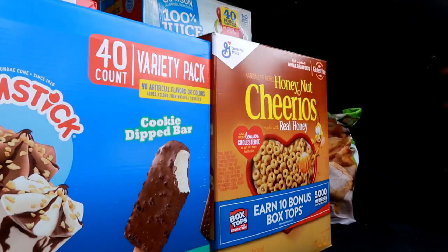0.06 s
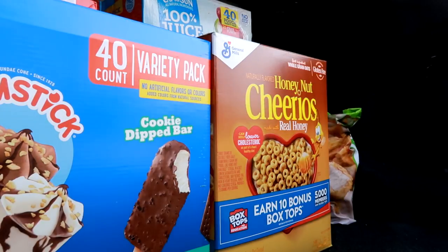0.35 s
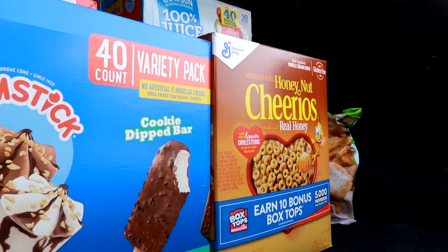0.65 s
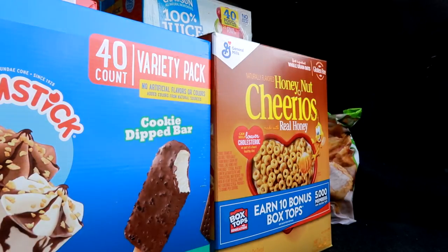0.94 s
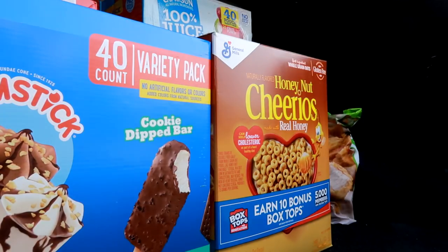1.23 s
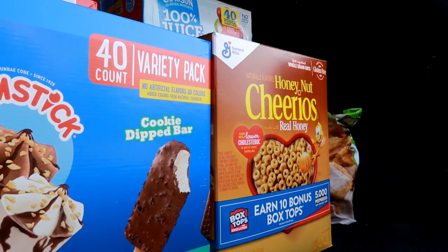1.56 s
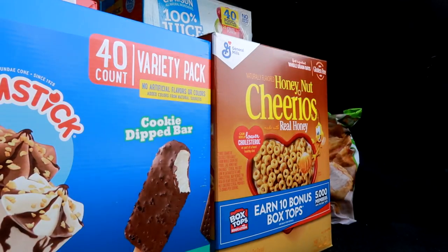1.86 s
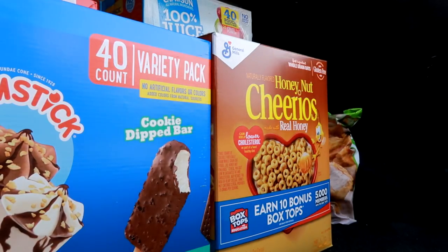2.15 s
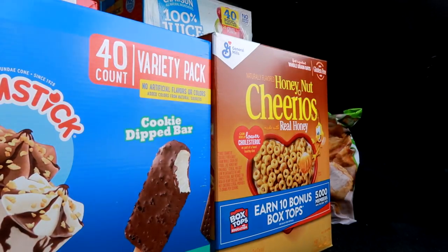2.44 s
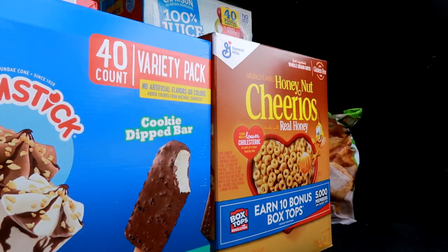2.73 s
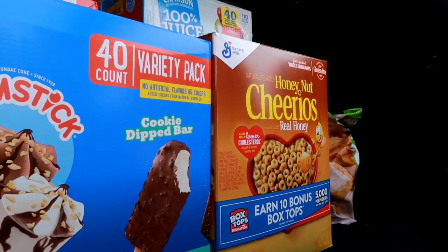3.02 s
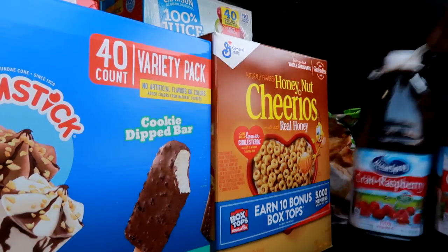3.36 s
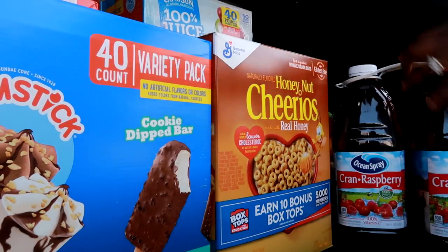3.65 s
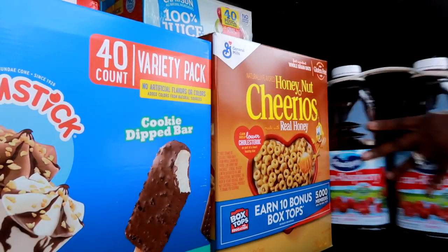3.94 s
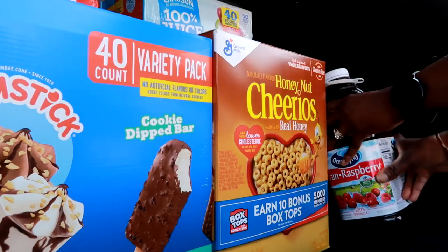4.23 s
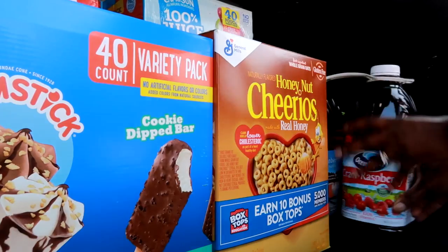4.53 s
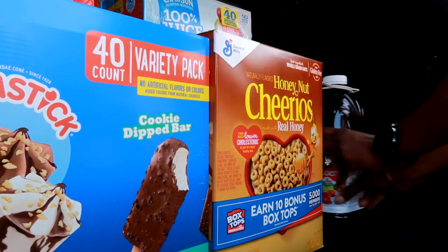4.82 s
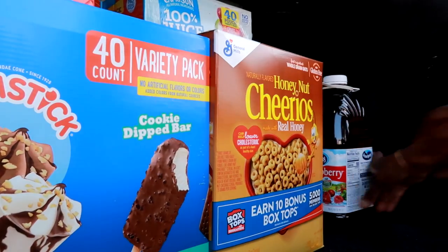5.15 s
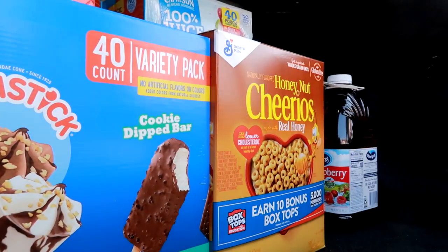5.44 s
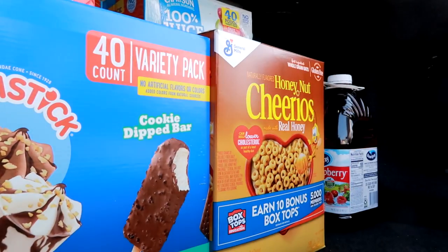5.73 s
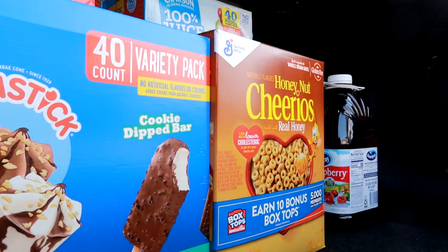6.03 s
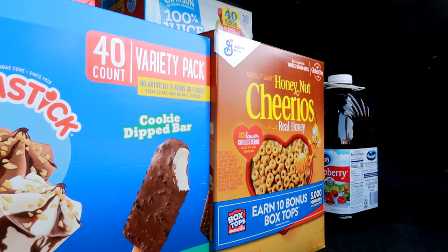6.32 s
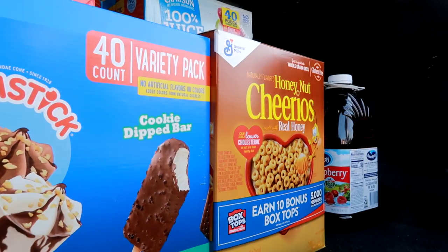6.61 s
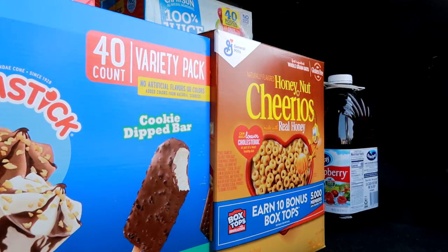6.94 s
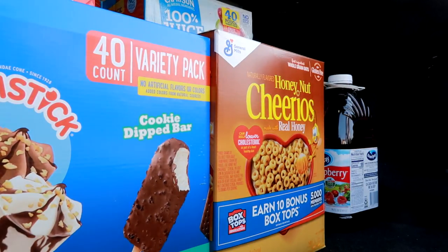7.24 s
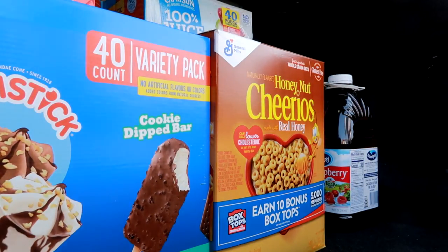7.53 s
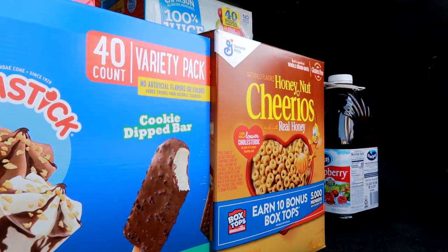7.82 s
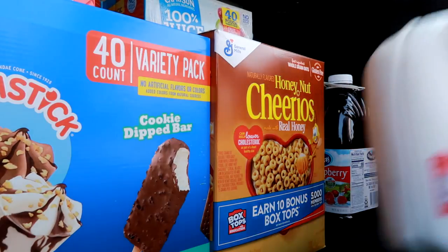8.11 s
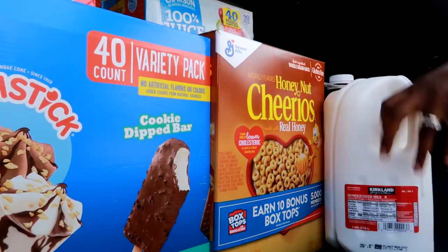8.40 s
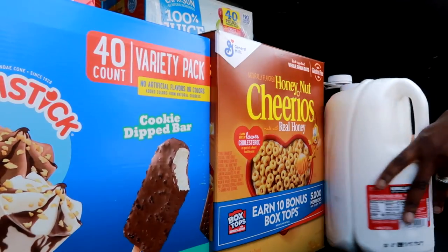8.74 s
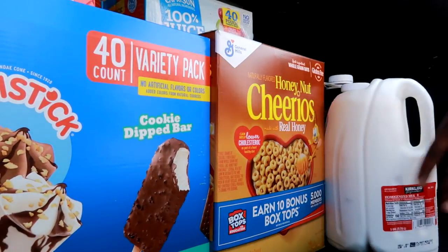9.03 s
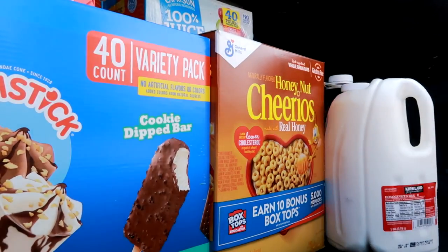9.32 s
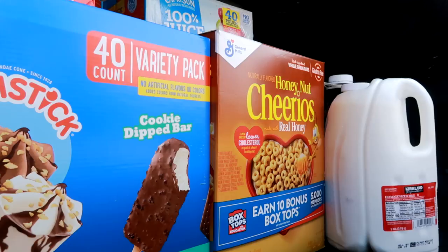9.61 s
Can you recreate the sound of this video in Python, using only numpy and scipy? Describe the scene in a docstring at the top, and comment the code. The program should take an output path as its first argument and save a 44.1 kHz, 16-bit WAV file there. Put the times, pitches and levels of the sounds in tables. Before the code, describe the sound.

Over a low engine-like hum and outdoor hiss, full plastic bottles and a jug scrape along cardboard, thump down and slosh.

```python
"""First comes a low wavering drone with rumble and outdoor hiss, as groceries are loaded into a car.
Plastic squeaks on card, snaps and rustles close by. Two juice bottles thud down, slosh and are shoved
in beside the cartons, their ribbed walls crackling. Later a milk jug catches and slides past a carton,
which makes its thin wall ring; then it lands and sloshes. Both landings make a limiter (an automatic
volume control) turn everything down, and the background creeps back."""
import sys
import numpy as np
from scipy import signal
from scipy.fft import rfft, irfft
from scipy.io import wavfile
from scipy.ndimage import uniform_filter1d, minimum_filter1d, map_coordinates

SR = 44100
rng = np.random.default_rng(int(sys.argv[2]) if len(sys.argv) > 2 else 0)


def unload_audio(sound):
    """Save the sound as a 16-bit wav file, at the path given as the first command line argument."""
    columns = np.transpose(np.atleast_2d(sound))
    # keep every value between -1 and 1, then stretch to whole-number steps
    steps = np.round(np.clip(columns, -1, 1) * 32767)
    wavfile.write(sys.argv[1], SR, steps.astype(np.int16))


N = 426447
TIME = np.arange(N) / SR
FREQS = np.fft.rfftfreq(8192, 1 / SR)

# the jug catches on a carton, then slips (time [s], catch level [dB], slide length [s], slide level [dB])
JUG_CATCHES = [(7.405, -22.5, 0.05, -32), (7.532, -23, 0.08, -34), (7.673, -23.5, 0.037, -29.5),
               (7.795, -21.5, 0.007, -29.5), (7.915, -26, 0.32, -24.5)]


def amp(db):
    """Turns decibels into a factor to multiply by."""
    return 10 ** (np.asarray(db) / 20)


def unit(x):
    """Scales a signal to an average strength (rms) of 1."""
    return x / np.sqrt(np.mean(x ** 2) + 1e-20)


def curve(rows):
    """Joins (time, value) points with straight lines."""
    return np.interp(TIME, *np.transpose(rows))


def shaped(x, response):
    """Filters a sound with one gain for each frequency in FREQS."""
    return signal.oaconvolve(x, np.fft.fftshift(irfft(response))[1:], "same")


def colour(x, points, peaks=()):
    """Gives a sound its tone: a smooth spectrum with resonances on top, at strength 1."""
    hz, db = np.transpose(points)
    shape_db = np.interp(np.log(FREQS + 1), np.log(hz), db)
    for centre, width, height in peaks:
        shape_db = shape_db + height / (1 + (2 * (FREQS - centre) / width) ** 2)
    return unit(shaped(x, amp(shape_db)))


def wander(rate_hz):
    """A random drift of strength 1 that wobbles up to about rate_hz."""
    coarse = TIME[::50]
    hz = np.fft.rfftfreq(len(coarse), coarse[1])
    spectrum = rfft(rng.standard_normal(len(coarse))) / (1 + (hz / rate_hz) ** 4)
    return np.interp(TIME, coarse, unit(irfft(spectrum, len(coarse))))


def add(mix, start, sound):
    """Mixes a sound in at start, given in seconds."""
    part = mix[max(round(start * SR), 0):][:len(sound)]
    part += sound[:len(part)]


def strokes(rows, attack_s, release_s):
    """Loudness of (start, length, dB) strokes: up 20 dB per attack_s, hold, down 20 dB per release_s."""
    power = np.zeros(N)
    for start, length, db in rows:
        away = np.maximum((start - TIME) / attack_s, (TIME - start - length) / release_s)
        power += amp(db - 20 * np.clip(away, 0, 10)) ** 2
    return np.sqrt(power)


def slips(per_s, spread_db, hiss):
    """Rubbing surfaces stick and slip: tiny random clicks over a smooth hiss."""
    sizes = amp(spread_db * np.minimum(rng.exponential(1, N), 4)) * rng.choice([-1, 1], N)
    clicks = unit(sizes * (rng.random(N) < per_s / SR))
    return unit(clicks + hiss * rng.standard_normal(N))


def crinkles(per_s, q):
    """Patches of thin plastic each buckle per_s times a second; a higher q rings longer."""
    out = np.zeros(N)
    for hz in np.geomspace(230, 6500, num=34):
        clicks = np.zeros(N)
        at = rng.integers(0, N, round(per_s * N / SR))
        clicks[at] = rng.choice([-1, 1], len(at)) * amp(3 * np.minimum(rng.exponential(1, len(at)), 3))
        out += signal.lfilter(*signal.iirpeak(hz, q, fs=SR), clicks + 1e-12)
    return unit(out)


def drone():
    """A gliding, fluttering hum like a nearby engine, with a faint higher tone and the car's rumble."""
    # glide of the hum (time [s], pitch [Hz])
    glide = [(0, 86.33), (.7, 97.4), (1.45, 98.8), (2.05, 93.9), (3.1, 88.37), (4.15, 87.4), (4.5, 89.44),
             (5.7, 94.36), (6.1, 97.1), (6.5, 92.34), (8, 88.12), (8.3, 83.74), (8.8, 89.7), (9.67, 84.5)]
    # how strongly it booms in the car (time [s], level [dB])
    hum_level = [(0, -18), (.5, -8.5), (1.4, -11.5), (2.2, -17), (2.5, -8.5), (3.05, -8.5), (3.9, -15.5),
                 (4.25, -6.5), (5.6, -9.5), (6.1, -27.5), (6.6, -12.5), (7.3, -9.5), (7.5, -15.5),
                 (8.25, -10), (8.55, -27), (9.1, -16), (9.35, -23.5), (9.67, -7.5)]
    # the higher tone (time [s], level [dB])
    upper_level = [(0, -32), (1.4, -21.5), (2.3, -33), (6, -24), (7.2, -30), (9.67, -43)]
    # tone of the car body's rumble (frequency [Hz], level [dB])
    rumble_tone = [(8, -64), (22, -2.5), (38, 17), (52, 21.5), (72, 20.5), (100, 21), (135, 10), (220, -52)]
    # swells of the rumble (time [s], level [dB])
    rumble_level = [(0, -15), (.8, -19.5), (1.4, -12), (3.2, -18.5), (3.6, -11), (4.9, -29), (5.4, -16.5),
                    (5.9, -17.5), (7.5, -18.5), (8.2, -15), (9, -24.5), (9.67, -15)]
    pitch = curve(glide)
    turns = np.cumsum(pitch + 0.5 * wander(9.2)) / SR
    hum = unit(np.sin(2 * np.pi * turns)) * amp(curve(hum_level) + 2.0 * wander(15.2))
    upper_turns = np.cumsum(1.54 * pitch + 2.24 * wander(11.9)) / SR
    upper = unit(np.sin(2 * np.pi * upper_turns)) * amp(curve(upper_level) + 1.4 * wander(1.3))
    rumble = colour(rng.standard_normal(N), rumble_tone) * amp(curve(rumble_level))
    return hum + upper + rumble


def outdoor_air():
    """A wash of noise from outside, made hollow by the cargo space."""
    # tone of the wash (frequency [Hz], level [dB])
    tone = [(60, -2), (110, -7), (150, -3), (200, -7.5), (260, -10), (330, -18.5), (500, -18), (640, -26.5),
            (1100, -21), (2000, -29), (3200, -37.5), (5000, -44), (10000, -48.5), (14000, -59.5)]
    # resonances of the cargo space (frequency [Hz], width [Hz], boost [dB])
    cabin = [(371, 6.6, 3), (520, 80, 4.5), (741, 273, 7), (1043, 19, 4)]
    # swells of the wash (time [s], level [dB])
    level = [(0, -21.5), (1.2, -21), (2.1, -21.5), (3.1, -21), (4.2, -22), (5.5, -21), (6.7, -20.5),
             (7.5, -20.5), (8.6, -22.5), (9.67, -20.5)]
    return colour(rng.standard_normal(N), tone, cabin) * amp(curve(level) + 1.3 * wander(20.3))


def squeaks():
    """Plastic catches on card and rings one note for a moment; the jug groans at each of its catches."""
    # squeaks (time [s], level [dB], pitch [Hz], width [Hz], length [s])
    events = [(0, -38.5, 2080, 250, 0.17), (0.099, -41.5, 2220, 400, 0.16), (1.7, -50, 3670, 250, 0.13),
              (1.909, -48.5, 3670, 220, 0.42), (5.292, -27.5, 2940, 350, 0.013),
              (7.391, -32, 1160, 150, 0.12), (7.525, -28.5, 2340, 200, 0.074),
              (7.672, -21.5, 1580, 50, 0.049), (7.677, -26.5, 743, 40, .05),
              (7.682, -28.5, 2860, 90, 0.042), (7.802, -30, 1610, 80, .045), (7.805, -27, 3190, 260, 0.065),
              (7.925, -32, 1580, 70, .045), (7.925, -26, 740, 50, .05), (7.996, -25, 3700, 400, 0.062),
              (8.052, -30.5, 4150, 349.6, .07), (8.233, -31, 3770, 250, .07), (8.813, -28, 610, 207, 0.13)]
    groan_db, groan_hz, groan_width_hz, groan_s = -7, 766, 26, 0.048
    groans = [(start, db + groan_db, groan_hz, groan_width_hz, groan_s) for start, db, _, _ in JUG_CATCHES]
    out = np.zeros(N)
    for start, db, hz, width, length in events + groans:
        progress = np.linspace(0, 1, round(length * SR))
        swell = np.sqrt(progress) * (1 - progress)
        ring = signal.lfilter(*signal.iirpeak(hz, hz / width, fs=SR), rng.standard_normal(SR // 2))
        add(out, start, amp(db) * unit(ring[-len(swell):] * swell))
    return out


def snaps():
    """Short cracks ring many wall notes at once; low ones bring out the hollow card."""
    # snaps of plastic and taps on card (time [s], level [dB], centre [Hz], time to fade 60 dB [s])
    events = [(0.191, -21, 696, 0.04), (1.0692, -14.5, 3400, 0.018), (1.079, -22, 3500, 0.025),
              (1.511, -24, 1580, 0.018), (2.43, -32, 3000, 0.024), (3.239, -15.5, 1080, 0.04),
              (3.312, -30, 822, 0.02), (3.811, -19, 910, 0.039), (3.974, -20, 2414, 0.033),
              (4.073, -19.5, 3743, 0.018), (4.145, -17, 8500, 0.018), (4.156, -16, 6500, 0.024),
              (4.171, -16, 1750, 0.025), (4.195, -25, 1500, 0.028), (4.226, -13, 1210, 0.054),
              (4.234, -7, 2300, 0.017), (4.251, -6, 1400, 0.038), (4.276, -11, 1300, 0.082),
              (4.328, -14, 2000, 0.04), (4.357, -14.5, 1220, 0.028), (4.453, -19, 1420, 0.029),
              (4.486, -29, 2310, 0.029), (4.516, -32, 3000, 0.021), (4.589, -21.5, 2600, 0.027),
              (4.632, -16.5, 910, 0.039), (4.67, -24, 3200, .03), (4.714, -21, 6400, 0.072),
              (4.7674, -7, 3480, 0.018), (4.8235, -15.5, 2300, 0.027), (4.8631, -12, 2700, 0.021),
              (4.884, -12.5, 2480, 0.03), (4.96, -17, 5500, .035), (4.9863, -.5, 6700, 0.02),
              (5.058, -10.5, 3470, 0.024), (5.249, -17.5, 3360, 0.022), (5.388, -20, 3060, 0.02),
              (6.438, -15.5, 1160, 0.1), (6.994, -36, 2960, 0.031), (7.218, -29.5, 2200, .03),
              (7.312, -21.5, 2070, 0.05), (7.403, -23, 3770, 0.13), (7.801, -22, 2400, 0.06),
              (7.92, -19, 1300, 0.036), (8.377, -15, 760, 0.024), (8.416, -8, 1470, 0.03),
              (8.43, -16, 1540, 0.18), (8.569, -22, 1120, .035)]
    card_hz, card_width_hz, spread_octaves, rise_share = 900, 140, 1.37, 0.035
    out, t = np.zeros(N), np.arange(4096) / SR
    freqs = np.fft.rfftfreq(len(t), 1 / SR)
    hollow = 1 + amp(3) / (1 + (2 * (freqs - card_hz) / card_width_hz) ** 2)
    for start, db, hz, fade_s in events:
        band = (1 + (np.log2((freqs + 1) / hz) / (2 * spread_octaves)) ** 2) ** -4.2
        ring = unit(irfft(rfft(rng.standard_normal(len(t))) * band * hollow))
        age = t / max(fade_s, .004)
        rise = 1 - np.exp(-age / rise_share)  # longer rings start more softly
        add(out, start, amp(db + 3.5 - 60 * age) * ring * rise)
    return out


def bottle_knocks():
    """A knock rings a bottle's hollow plastic shoulder; stiffer spots ring higher and shorter."""
    # knocks (time [s], level [dB], pitch [Hz])
    events = [(0.191, -25, 618), (3.239, -13.5, 1008), (3.312, -24, 642), (3.811, -20, 720),
              (4.171, -21, 1396), (4.279, -19, 1090), (4.381, -22.5, 1160), (4.574, -21, 1136),
              (4.62, -28, 1338), (4.742, -24, 1490), (4.903, -19, 1250), (4.944, -18, 1040),
              (4.768, -15, 3070), (5.06, -16, 1880), (5.062, -9, 4170), (5.25, -18.5, 4200),
              (5.388, -19.5, 2780), (6.44, -26, 830)]
    # notes of the shoulder (multiple of the pitch, level [dB], time to fade 60 dB [cycles of the pitch])
    shoulder = [(1, 1.5, 50), (1.12, -1, 38), (1.32, -0.5, 52), (1.96, -2, 28), (2.23, -5, 42),
                (2.71, -6, 42)]
    rise_s = 0.00049
    out, t = np.zeros(N), np.arange(SR // 5) / SR
    for start, db, hz in events:
        ring = np.zeros(len(t))
        for multiple, note_db, cycles in shoulder:
            note = np.sin(2 * np.pi * (hz * multiple * t + rng.random()))
            ring += amp(note_db - 60 * t * hz / cycles) * note
        add(out, start, amp(db) * ring * (1 - np.exp(-t / rise_s)))
    return out


def carton_rustle():
    """Hands and packaging rub lightly, almost smoothly, on the cartons."""
    # tone of the rubbing (frequency [Hz], level [dB])
    tone = [(300, -5), (700, -18.5), (2000, 5), (3500, -1), (6000, -6.5), (10000, -7.5), (14000, -19.5)]
    # resonances of the carton panels (frequency [Hz], width [Hz], boost [dB])
    panels = [(1520, 74, 4), (3660, 300, 4.5), (6540, 400, 3.5)]
    # soft swishes (time [s], length [s], level [dB])
    swishes = [(1.22, 0.3, -43), (1.71, 0.13, -42.5), (1.93, 0.26, -38), (2.42, .05, -37.5),
               (3.55, .11, -38.5), (6.22, 0.069, -48.5), (6.74, 0.045, -40.5), (8.5, 0.12, -40.5),
               (8.68, 0.016, -36), (8.83, 0.073, -38), (9.3, 0.55, -43)]
    friction = slips(per_s=1100, spread_db=-0.5, hiss=0.81)
    return colour(friction, tone, panels) * strokes(swishes, attack_s=0.11, release_s=0.15)


def thuds():
    """Full containers hit carpet or each other with a dull puff; low thuds start softer and ring longer."""
    # landings, bounces and bumps (time [s], peak level [dB], pitch [Hz])
    events = [(3.4729, 12, 486), (3.4728, 9, 212), (3.495, 9, 174), (3.537, -7, 480), (4.351, -10, 414),
              (4.457, -8, 412), (4.568, -2.5, 613), (4.79, -14, 430), (5.152, -12, 548),
              (5.236, -11.5, 500), (8.329, 8, 270), (8.334, 9, 437), (8.4177, 0, 475), (8.489, -7, 427)]
    # notes of a full container (multiple of the pitch, level [dB], share of the fade time)
    notes = [(1, 6.5, 0.85), (1.55, -5.5, .7), (2.201, -4, 0.39), (3.4, 1, 0.037)]
    fade_cycles, rise_cycles = 11.7, 0.24
    out, t = np.zeros(N), np.arange(SR // 2) / SR
    for start, db, hz in events:
        fade_s, rise_s = fade_cycles / hz, rise_cycles / hz
        ring = sum(amp(note_db - 60 * t / (fade_s * share)) * np.sin(2 * np.pi * hz * multiple * t)
                   for multiple, note_db, share in notes)
        dull_noise = signal.lfilter(*signal.butter(2, 900, fs=SR), rng.standard_normal(len(t)))
        puff = unit(dull_noise) * amp(-18.5 - 60 * t / fade_s)
        blow = (ring + puff) * (1 - np.exp(-t / rise_s))
        add(out, start, amp(db) * blow / abs(blow).max())
    return out


def sloshes():
    """The liquid churns in a rattle of small bubbles; heavy glugs ring briefly and climb in pitch."""
    # spells of churning (time [s], length [s], level [dB])
    churns = [(3.5, 0.085, -23), (3.99, 0.035, -24), (4.18, 0.12, -17), (4.44, 0.037, -19.5),
              (4.82, 0.086, -22.5), (5.2, 0.15, -22.5), (8.345, 0.12, -11.5), (8.45, 0.08, -12.5)]
    # tone of the churning (frequency [Hz], level [dB])
    tone = [(90, -5), (160, 10.5), (230, 1), (350, -9), (550, -9), (800, -20), (1500, -37), (4000, -65)]
    # heavy glugs against the wall (time [s], level [dB], starting pitch [Hz])
    glugs = [(3.54, -3, 185), (3.566, -12, 270), (3.586, 0.5, 165), (3.614, -9.5, 215), (4.51, -11, 224),
             (8.388, -4.5, 190), (8.444, 7, 172), (8.468, 4, 120), (8.503, -2, 202), (8.518, 1.5, 172.3),
             (8.553, -8, 236)]
    fade_s, rise_s, climb_per_s = 0.13, 0.0025, 1.3
    bubbles = crinkles(per_s=50, q=6.2) + 0.67 * slips(per_s=400, spread_db=0.0, hiss=0.31)
    out = colour(bubbles, tone) * strokes(churns, attack_s=0.049, release_s=0.1)
    t = np.arange(SR // 4) / SR
    for start, db, hz in glugs:
        ring = np.sin(2 * np.pi * hz * (t + climb_per_s * t ** 2 / 2))
        add(out, start, amp(db - 60 * t / fade_s) * (1 - np.exp(-t / rise_s)) * ring)
    return out


def bottle_shove():
    """Ribbed bottles judder along: fine slips, and clumps of small and large buckles in their walls."""
    # pushes along the floor and the carton (time [s], length [s], level [dB])
    pushes = [(3.98, 0.99, -30), (4.17, 0.093, -17), (4.335, 0.016, -21.5), (4.44, 0.4, -31),
              (4.825, 0.11, -18), (4.98, 0.072, -24.5), (5.21, 0.18, -30)]
    # tone of the scraping (frequency [Hz], level [dB])
    tone = [(200, 9), (350, -2), (600, -5.5), (900, -9), (1400, -11.5), (1900, -10.5), (2700, -12.5),
            (4000, -16.5), (5500, -21), (8000, -14.5), (11000, -11.5), (14000, -22)]
    # resonances and one dead band of the wall (frequency [Hz], width [Hz], boost [dB])
    wall = [(950, 200, 3), (1560, 140, -6), (1920, 300, 3), (2690, 200, 3), (3880, 250, 2.5),
            (5450, 250, 2)]
    crackle = .6 * slips(per_s=1800, spread_db=2.8, hiss=.5) + crinkles(per_s=190, q=9)
    crackle += amp(-5) * crinkles(per_s=6, q=16)  # larger buckles ring longer
    crackle *= amp(2.5 * wander(50))
    return colour(crackle, tone, wall) * strokes(pushes, attack_s=0.072, release_s=0.047)


def whines():
    """Thin wavering tones drift in under the outdoor wash."""
    # faint tones (time [s], length [s], level [dB], pitch [Hz], waver [Hz])
    tones = [(5.0, 4.7, -42, 364, 2.09), (5.6, 1.8, -42, 866, 24.7), (9.0, .7, -39.5, 779, 11.86)]
    out = np.zeros(N)
    for start, length, db, hz, waver in tones:
        turns = np.cumsum(hz + waver * wander(30)) / SR
        swell = strokes([(start, length, db)], attack_s=0.73, release_s=0.73)
        out += unit(np.sin(2 * np.pi * turns)) * swell
    return out


def jug_rub():
    """Friction and chatter ring the jug: low notes when it catches, added hiss when it slides."""
    # tone of the jug's body (frequency [Hz], level [dB])
    body_tone = [(150, -20), (300, 2), (700, 3.5), (1100, -2), (1600, -4), (2400, -2.5), (3200, -10.5),
                 (6000, -44)]
    # tone of its sliding hiss (frequency [Hz], level [dB])
    hiss_tone = [(1500, -17.5), (2500, -15), (3000, 0), (4500, -6), (6000, -6), (8000, -9), (11000, -10.5),
                 (14000, -36)]
    # resonances of its thin wall and air pocket (frequency [Hz], width [Hz], boost [dB])
    wall = [(738, 48, 11), (1070, 79, 7), (1550, 32, 9), (2020, 63, 8), (2430, 68, 3), (2870, 65, 5),
            (3165, 55, 7.5), (3380, 50, 6), (3765, 70, 6.5), (4010, 40, 3), (4240, 70, 5), (4475, 55, 8),
            (5615, 90, 6), (6620, 90, 5), (7710, 90, 5)]
    # notes that ring on after the rubbing (pitch [Hz], level [dB])
    notes = [(1075, -5), (1560, -3), (2030, -2), (2860, -1), (3165, -7), (3380, -3), (3765, -1), (4010, -1),
             (4240, -1), (4478, 2)]
    catch_hold_s, slide_delay_s = 0.017, 0.044
    ring_fade_s, sway_db, flex_s = .17, 5, .00006
    friction = slips(per_s=3000, spread_db=2.6, hiss=.6) * amp(2.2 * wander(75))
    friction += amp(-8) * crinkles(per_s=55, q=31)  # the wall chatters
    catches = [(start, catch_hold_s, db) for start, db, _, _ in JUG_CATCHES]
    slides = [(start + slide_delay_s, length, db) for start, _, length, db in JUG_CATCHES]
    catch = strokes(catches, attack_s=0.0069, release_s=0.21)
    slide = strokes(slides, attack_s=0.099, release_s=0.11)
    body = colour(friction, body_tone, wall) * np.hypot(catch, amp(-3.5) * slide)
    rub = body + colour(friction, hiss_tone, wall) * slide
    ring = np.zeros(N)
    for hz, db in notes:
        q = hz * ring_fade_s * np.pi / np.log(1000)
        sway = amp(sway_db * wander(10))  # the notes take turns as the contact point moves
        ring += amp(db) * signal.lfilter(*signal.iirpeak(hz, q, fs=SR), rub * sway)
    flexed = (TIME + flex_s * wander(7)) * SR  # the flexing wall bends the pitch a little
    return amp(-1.5) * map_coordinates(rub + ring, [flexed], order=3)


def cargo_echo(x, fade_s, echo_db):
    """Adds the short echo of the car's inside, damped by carpet."""
    t = np.arange(SR // 4) / SR
    tail = rng.standard_normal(len(t)) * amp(-60 * t / fade_s) * (t > .004)
    return x + amp(echo_db) * signal.fftconvolve(x, tail / np.linalg.norm(tail))[:N]


def handling():
    """All the rubbing, knocking and snapping, with the car's echo."""
    sounds = bottle_shove() + jug_rub() + squeaks() + carton_rustle() + snaps() + bottle_knocks()
    return cargo_echo(sounds, fade_s=0.043, echo_db=-10.5)


def stereo(source, phase_scale, scatter_hz, right_db):
    """Two microphone openings: the left lags in the treble, where scattered sound also sets them apart."""
    # wave shift of the left side against the right (frequency [Hz], phase [radians])
    left_phase = [(0, 0), (1000, -0.07), (3300, 0.75), (5200, -1.26), (7400, -1.88), (8900, -2),
                  (11000, -3)]
    scatter_share = .21 * FREQS / (FREQS + scatter_hz) * FREQS / (FREQS + 500)
    direct = shaped(source(), np.sqrt(1 - scatter_share))
    scattered = shaped(source(), np.sqrt(scatter_share))  # the same events with fresh randomness
    tilt = amp(right_db / 2 * FREQS / (FREQS + 300))
    lag = np.exp(1j * phase_scale * np.interp(FREQS, *np.transpose(left_phase)))
    return np.array([shaped(direct + scattered, lag / tilt), shaped(direct - scattered, tilt)])


def scene():
    """Handling and outdoor air sit a little to the right; everything else is in the middle."""
    near = stereo(handling, phase_scale=1.0, scatter_hz=3980, right_db=1.1)
    far = stereo(outdoor_air, phase_scale=1.13, scatter_hz=3000, right_db=2.0)
    dip_at_s, dip_width_s, dip_db = 1.868, 0.016, -8  # these two layers dip briefly
    dip = amp(dip_db * np.exp(-((TIME - dip_at_s) / dip_width_s) ** 2))
    return (near + far) * dip + thuds() + sloshes() + drone() + whines()


def record(dry):
    """Loud peaks turn the volume down; it holds, then creeps back. The highest treble is cut."""
    threshold_db, hold_s, recovery_db_per_s = 4.5, 0.2, 21.0
    ceiling, cutoff_hz = .97, 15200
    dry = dry * signal.windows.tukey(N, .001)
    soft_treble = amp(np.interp(FREQS, [11500, 14000, 16000], [0, -1.5, -7]))
    dry = np.array([shaped(channel, soft_treble) for channel in dry])
    peak = abs(dry).max(0) + 1e-9
    half_hold = round(hold_s * SR / 2)
    needed_db = np.minimum(threshold_db - 20 * np.log10(peak), 0)
    held_cut_db = -minimum_filter1d(needed_db, size=2 * half_hold + 1, origin=half_hold)
    recovery_db = recovery_db_per_s * TIME
    cut_db = np.maximum.accumulate(held_cut_db + recovery_db) - recovery_db
    gain = np.minimum(amp(-cut_db), ceiling / peak)  # a fast limiter catches what is still too loud
    gain = uniform_filter1d(minimum_filter1d(gain, size=129), size=129)
    low_pass = signal.firwin(255, cutoff_hz, window=("kaiser", 9), fs=SR)
    return signal.oaconvolve(dry * gain, low_pass[None], "same")


dry = scene()
out = record(dry)
unload_audio(out)
```